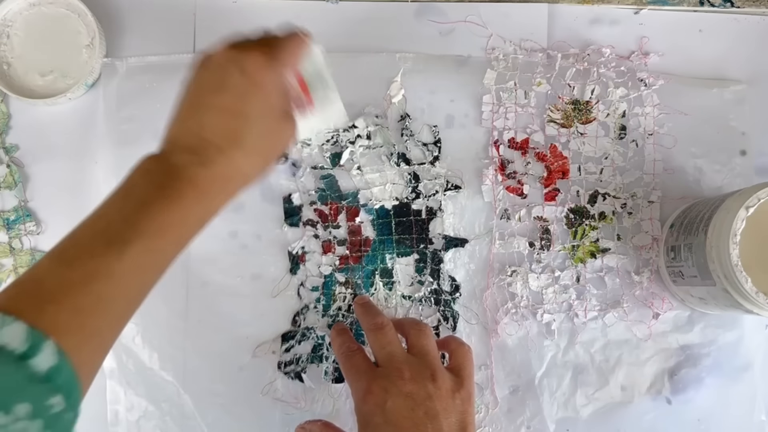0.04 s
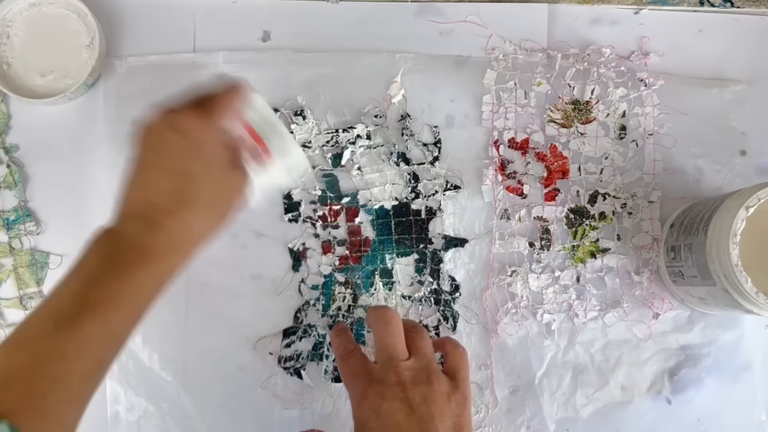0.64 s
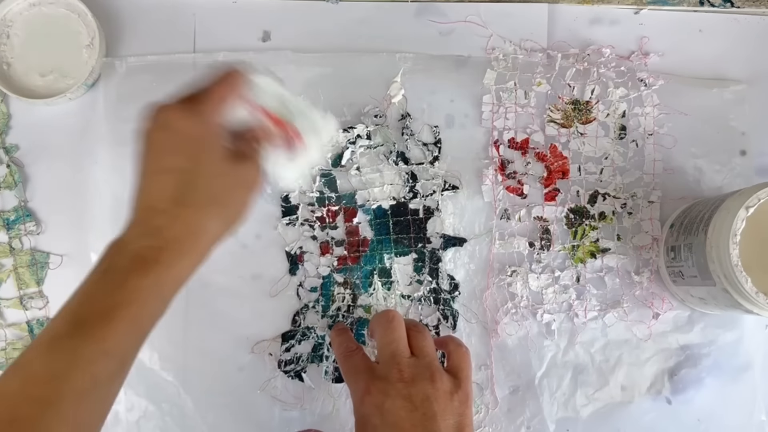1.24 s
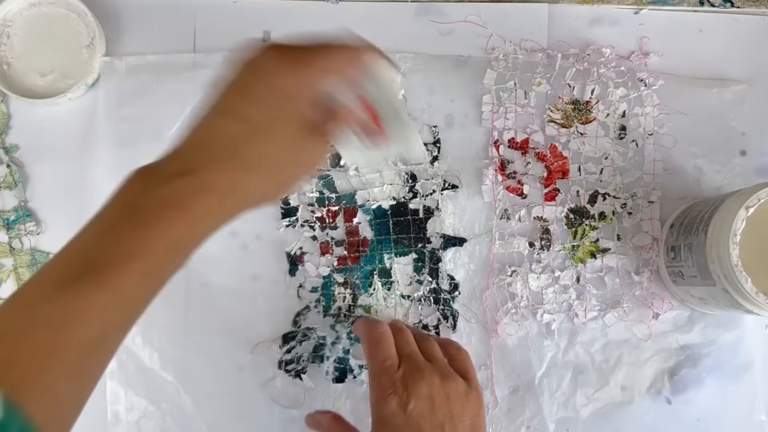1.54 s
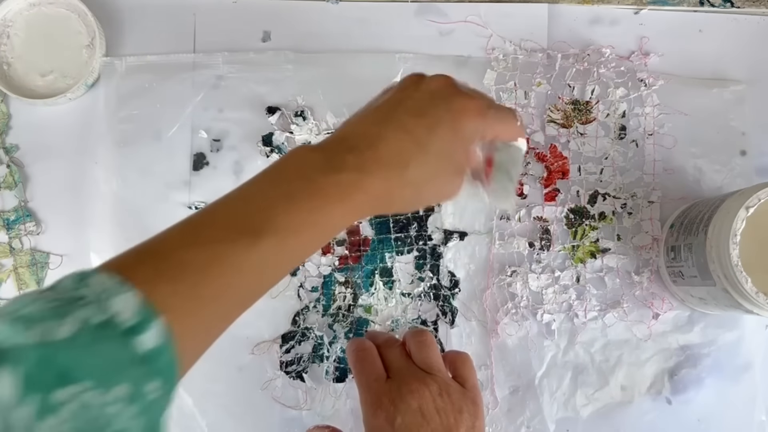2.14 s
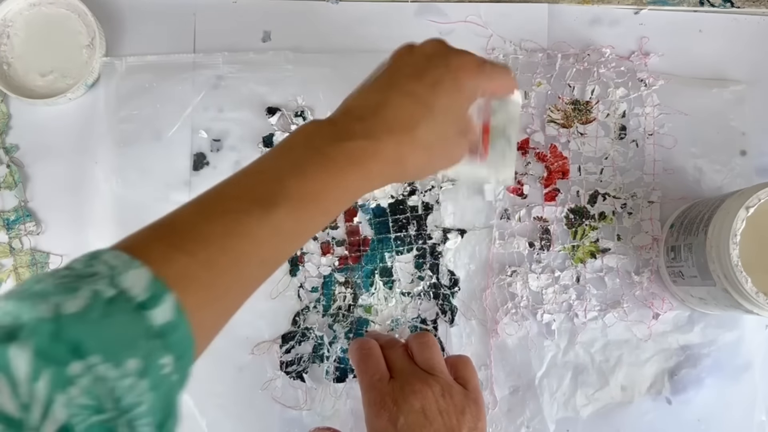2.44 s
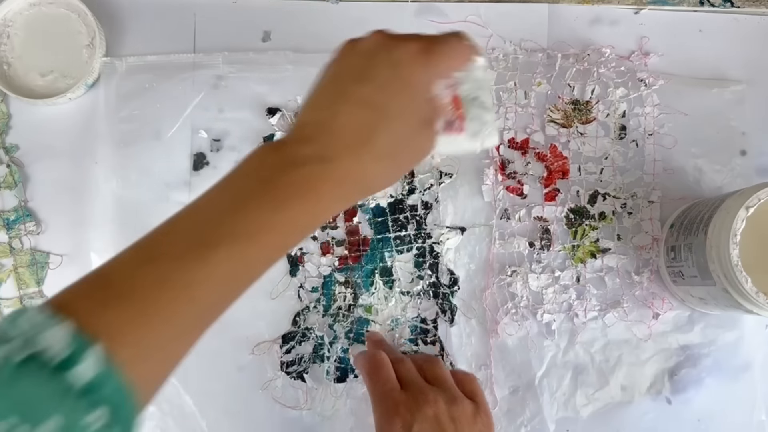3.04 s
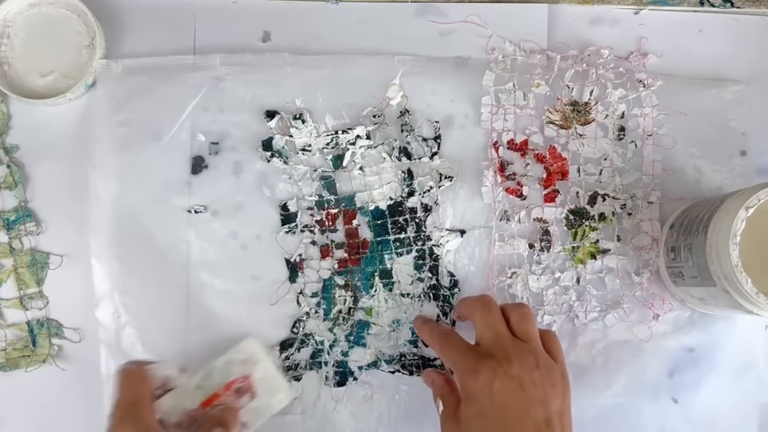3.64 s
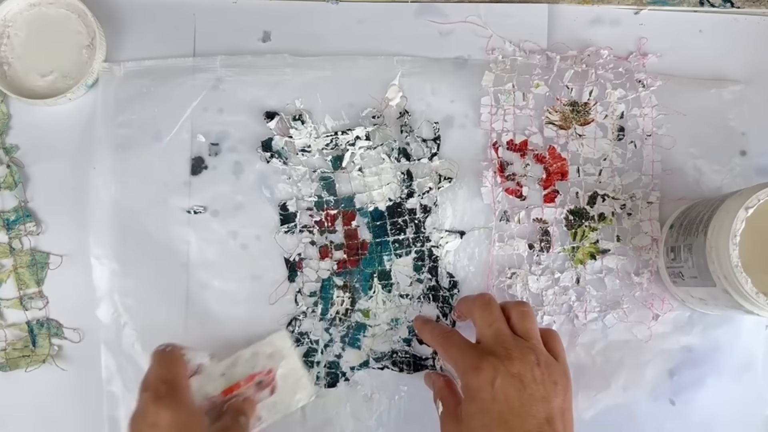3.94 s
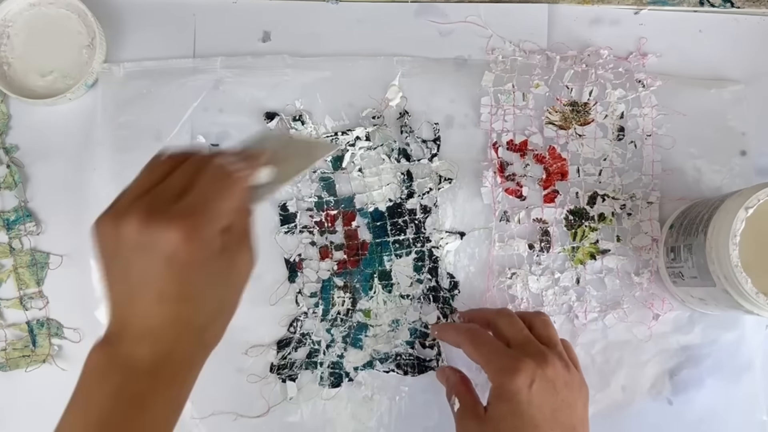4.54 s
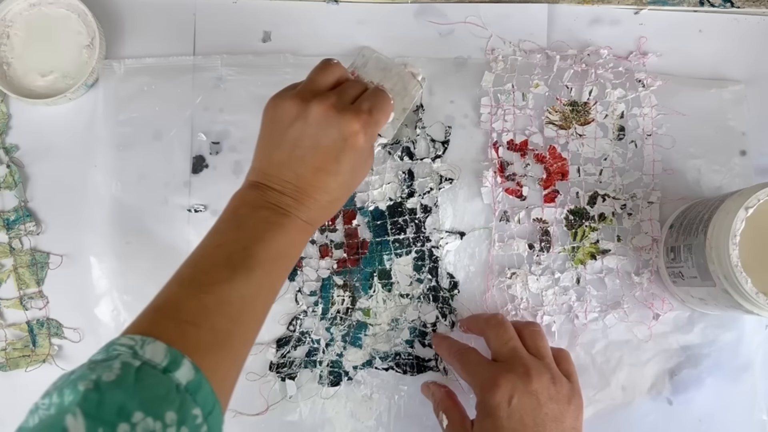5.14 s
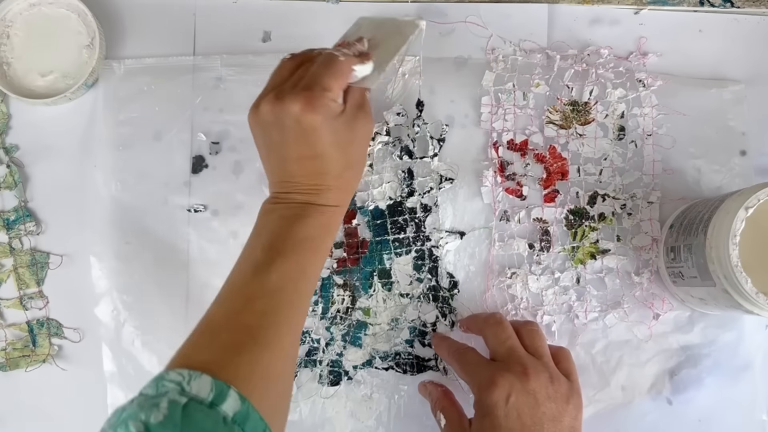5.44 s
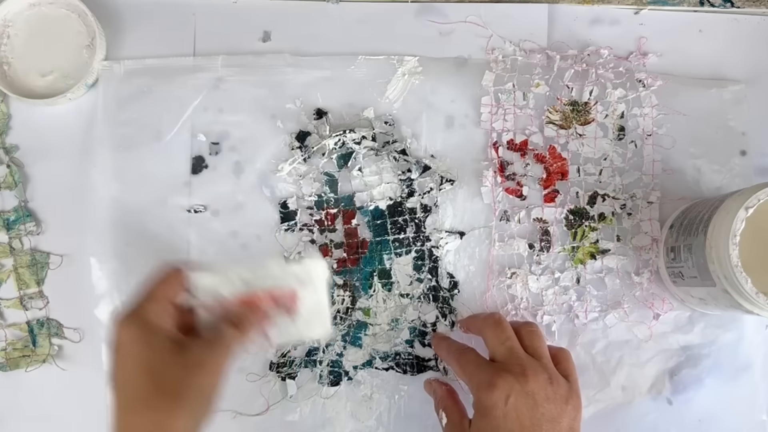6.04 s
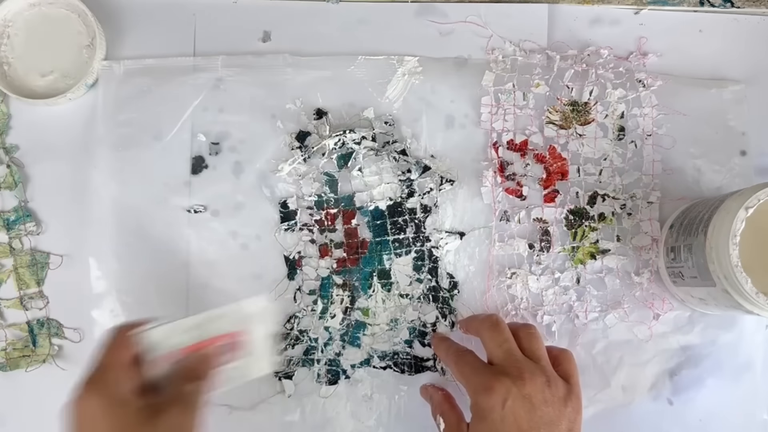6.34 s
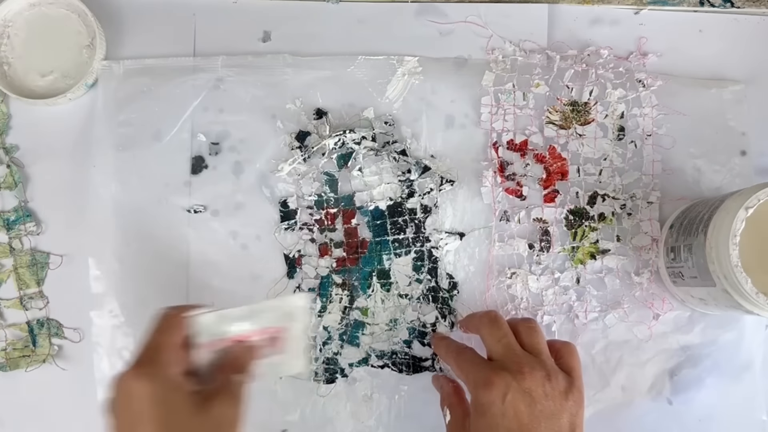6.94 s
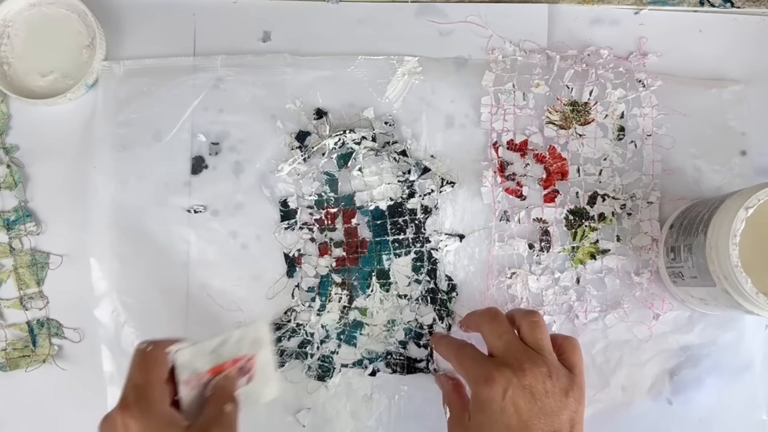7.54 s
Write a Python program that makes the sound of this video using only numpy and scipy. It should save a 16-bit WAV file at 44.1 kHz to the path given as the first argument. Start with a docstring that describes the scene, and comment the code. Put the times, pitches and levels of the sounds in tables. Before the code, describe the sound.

A wet, paint-loaded sponge dabs paper netting on a plastic-covered table, close by in a small room. From the start to about 3 seconds come roughly eleven quick dabs, each a short foamy fizz with a papery crinkle and a soft, low table thud, dotted with tiny snaps of creases and tacky paint. From about 3.5 to 4.4 seconds, three dabs land on the loose plastic, with more crackle and less thud. Light brushing and rustling follow around 4.5 seconds, then two quieter, slower presses near 5 and 5.3 seconds and a soft rustle up to 6 seconds. A faint, low motor hum rises at about 5 seconds and stays underneath. From about 6.1 seconds the dabbing resumes, around three a second, crisp and crackly, until the end near 7.8 seconds.

```python
"""Soft, wet dabs: a paint-loaded sponge presses paper netting on a plastic-covered table, close by.
Each dab squeezes a fizz from the foam, crinkles the sheet and thuds softly in the table.
Creases buckle and tacky paint snaps as it lets go. Dabs at the near edge land on the loose
sheet and crackle more. The room is small, and a faint motor hums in the second half."""
import sys
import numpy as np
from scipy import signal
from scipy.fft import rfft, irfft, next_fast_len
from scipy.io import wavfile
from scipy.ndimage import uniform_filter1d

SR = 44100
rng = np.random.default_rng(int(sys.argv[2]) if len(sys.argv) > 2 else 0)


def store_pcm(level_fs):
    """Save levels as 16-bit WAV."""
    pcm = np.round(np.clip(level_fs, -1, 1) * 32767).astype(np.int16)
    wavfile.write(sys.argv[1], SR, np.atleast_2d(pcm).T)


N = 343539
LEVEL_STEP = 20   # samples between the points of a loudness curve


def from_db(db):
    """Turn decibels into a gain."""
    return 10 ** (np.asarray(db) / 20)


def add_db(*levels):
    """Level of unrelated sounds heard together."""
    return 10 * np.log10(sum(10 ** (db / 10) for db in levels))


def rms_one(x):
    """Scale a sound to an average strength (rms) of 1."""
    return x / np.sqrt(np.mean(x ** 2) + 1e-20)


def peak_one(x):
    """Scale a sound so that its loudest few milliseconds have rms 1."""
    return x / np.sqrt(uniform_filter1d(x ** 2, size=110).max())


def curves(rows):
    """Join timed rows with straight lines: one curve for each column after the time."""
    time_s, *columns = np.transpose(rows)
    return [np.interp(np.arange(N) / SR, time_s, column) for column in columns]


def butter(x, hz, kind, order=2):
    """Keep the "low" or the "high" side of a frequency."""
    return signal.sosfilt(signal.butter(order, np.clip(hz, 10, .45 * SR), kind, fs=SR, output="sos"), x)


def resonate(x, hz, width_hz):
    """Ring at one pitch; the narrower the width, the longer the ring."""
    r = np.exp(-np.pi * width_hz / SR)
    feedback = [1, -2 * r * np.cos(2 * np.pi * hz / SR), r * r]
    return signal.lfilter(np.array([1, 0, -1]) * (1 - r * r) / 2, feedback, x)


def coloured(x, spectrum):
    """Give a steady sound its tone colour, at rms 1."""
    hz, level_db = np.transpose(spectrum)
    size = next_fast_len(N)
    log_hz = np.log(np.arange(size // 2 + 1) * SR / size + 1)
    gain = from_db(np.interp(log_hz, np.log(hz), level_db, left=-90, right=-90))
    return rms_one(irfft(rfft(x, size) * gain, size)[:N])


def blend(a, b, share):
    """Mix two unrelated sounds at equal power; share is the part of b."""
    share = np.clip(share, 0, 1)
    return np.sqrt(1 - share) * a + np.sqrt(share) * b


def grains(per_s, spread_db):
    """Tiny random clicks; a spread above 0 makes a few much larger than the rest."""
    sizes = from_db(spread_db * np.minimum(rng.exponential(1, N), 4))
    return rms_one((rng.random(N) < per_s / SR) * sizes * rng.choice([-1, 1], N))


def texture(level_db, per_s, spread_db, grainy):
    """Separate grains under the sponge, melting to a smooth hiss as the sound dies away."""
    contact = np.interp(level_db, [-60, -36], [.05, 1])
    return blend(rng.standard_normal(N), grains(per_s, spread_db), grainy * contact)


def clumps(flutter_hz, depth_db):
    """Grains come in little avalanches: a fast, uneven gain."""
    surge = rms_one(butter(rng.standard_normal(N), flutter_hz, "low"))
    return rms_one(from_db(depth_db * np.clip(surge, -2, 2)))


def room(x, fade_s=0.3):
    """The walls of a small room return a short wash of echoes that falls 60 dB in fade_s."""
    t = np.arange(SR // 2) / SR
    tail = rng.standard_normal(len(t)) * from_db(-60 * t / fade_s) * (t > .005)
    tail = butter(tail, 16000, "low", order=1)
    return signal.fftconvolve(x, tail / np.sqrt(np.sum(tail ** 2)))[:N]


# The motor's two tones: pitch_hz, relative_db
MOTOR_TONES = [(95, 13), (142.5, -0.5)]
# How loud the motor is: time_s, level_db
MOTOR_LEVEL = [(0, -64), (3.2, -63), (4.7, -64), (5.4, -48.5), (5.7, -52.5), (6.1, -55), (6.5, -48),
               (7.79, -54)]


def motor_hum():
    """A distant motor hums, wavering a little in pitch."""
    wavering_s = np.arange(N) / SR + .0012 * rms_one(butter(rng.standard_normal(N), 3, "low"))
    tones = sum(from_db(db) * np.sin(2 * np.pi * hz * wavering_s) for hz, db in MOTOR_TONES)
    return from_db(curves(MOTOR_LEVEL)[0]) * rms_one(tones)


# The paper's quiet rustle, in relative levels: time_s, treble_db, middle_db, bass_db
PAPER_RUSTLE = [(0.0, -71.0, -61.5, -60), (0.57, -68.5, -63.5, -53.5), (1.0, -69, -60, -70),
                (1.55, -54.5, -50, -51), (1.64, -59, -55.5, -55), (2.2, -74.5, -66, -62),
                (3.12, -54.5, -48.0, -46), (3.4, -56, -53.5, -59.5), (4.1, -61.0, -57, -58),
                (4.44, -47, -41.5, -68), (4.6, -52.5, -52.5, -53.5), (4.68, -59.5, -58, -59),
                (4.85, -67.0, -57, -55.5), (5.48, -63, -56, -51), (5.62, -48, -44.5, -40.5),
                (5.96, -56.5, -48.5, -47.5), (6.08, -70, -64.5, -52.5), (7.79, -53, -46.5, -58)]


def rustle_levels():
    """The paper rustles between dabs: the resting levels of fizz, crinkle and thud, in dB."""
    treble, middle, bass = [level[::LEVEL_STEP] for level in curves(PAPER_RUSTLE)]
    return treble + 1, middle - 1.5, bass - 3


def settling_creases(crinkle_db, per_s, gain_db):
    """The crumpled paper settles in sparse little ticks, each at one of twelve pitches."""
    pitches_hz = np.geomspace(1200, 6000, num=12)
    ticks = grains(per_s, spread_db=0)
    chosen = rng.integers(0, len(pitches_hz), N)
    rings = sum(resonate(ticks * (chosen == k) + 1e-18, hz, width_hz=67) * (hz / 2000) ** -.4
                for k, hz in enumerate(pitches_hz))
    # the ticks level off under a loud crinkle, so they stand out only between dabs
    settling_db = np.interp(crinkle_db, [-70, -38, -24], [-72, -38, -37])
    return from_db(settling_db + gain_db) * rms_one(rings)


# The sponge lands flat and traps air under the sheet: start_s, relative_db, pitch_fall_s
AIR_PATS = [(2.002, -27, 0.0077), (2.268, -28.5, 0.0076), (2.555, -26, 0.0061), (3.432, -48, .022),
            (3.835, -36.5, .008), (4.159, -40, .009), (7.378, -36, .009)]


def air_pats(start_hz=750, end_hz=135):
    """A cushion of air is pushed out: a soft pat whose pitch drops as the sheet settles."""
    out, t = np.zeros(N + SR), np.arange(SR // 6) / SR
    phases = rng.uniform(0, 2 * np.pi, len(AIR_PATS))
    for (start_s, db, fall_s), phase in zip(AIR_PATS, phases):
        pitch_hz = end_hz + (start_hz - end_hz) * np.exp(-t / fall_s)
        tone = np.sin(2 * np.pi * np.cumsum(pitch_hz) / SR + phase)
        age = t / (fall_s + 0.012)
        swell = (age * np.exp(1 - age)) ** 2
        start = round(start_s * SR)
        out[start:start + len(t)] += from_db(db + 1) * swell * tone
    return out[:N]


# The table top's low notes, and their relative levels when it is pressed in the middle or at the edge:
# pitch_hz, width_hz, middle_db, edge_db
TABLE_NOTES = [(54.4, 7.3, -15, -21), (106.8, 24, -33, 5.5), (140.4, 33, -0.5, 2), (180.7, 65, 1, -8.5),
               (254.6, 18, 0.5, -9.5), (307.5, 21.6, -1.5, -5.5), (366.4, 45, -7.5, 0),
               (443, 205, -14, -5.5)]


def table_thud(level_db, near_edge, slowness):
    """The soft, uneven push of the sponge shakes the low notes of the table top."""
    push, middle, edge = rng.standard_normal(N), 0, 0
    for k, (hz, width_hz, middle_db, edge_db) in enumerate(TABLE_NOTES):
        note = (-1) ** k * resonate(push, hz, width_hz)
        middle = middle + from_db(middle_db) * note
        edge = edge + from_db(edge_db) * note
    shake = blend(rms_one(middle), rms_one(edge), near_edge)
    shake = butter(butter(shake, 760, "low"), 40, "high", order=4)
    # a slow press favours the low notes
    shake = blend(shake, rms_one(resonate(push, 159, width_hz=63)), slowness)
    # the hand sets the strength of each thud, so chance swells are evened out
    shake = shake / np.sqrt(uniform_filter1d(shake ** 2, size=1500) + 1e-9)
    # under a hard press the foam is flat and part of the push goes into the knock
    spent_db = np.interp(level_db, [-34, -20], [0, -2.5])
    return from_db(level_db + spent_db - 0.97) * butter(shake, 28, "high")


# The sponge squashes flat against the table: start_s, relative_db, pitch_hz
TABLE_KNOCKS = [(0.06, -22.5, 181), (0.281, -24, 171), (0.648, -23, 189), (1.128, -19, 193),
                (1.334, -22, 183), (2.094, -16, 150), (2.397, -23, 169), (2.566, -25.5, 158),
                (2.677, -20.5, 170), (2.891, -24, 166), (2.928, -17.5, 153), (3.849, -28.5, 145),
                (4.227, -27.5, 170), (5.03, -29, 155), (5.08, -27, 143), (5.115, -27.5, 136),
                (6.282, -26.5, 122), (6.576, -28, 115), (6.87, -27, 142.1), (7.766, -29, 175)]


def table_knocks(rise_s=0.0076):
    """A soft push makes one table note swell and die quickly, with a weaker, higher note beside it."""
    out, t = np.zeros(N + SR), np.arange(SR // 8) / SR
    swell = (t / rise_s * np.exp(1 - t / rise_s)) ** 2.7
    tail = 0.055 * (1 - np.exp(-t / rise_s)) * from_db(-60 * t / 0.13)
    phases = rng.uniform(0, 2 * np.pi, (len(TABLE_KNOCKS), 2))
    for (start_s, db, hz), phase in zip(TABLE_KNOCKS, phases):
        low = np.sin(2 * np.pi * hz * t + phase[0])
        high = from_db(-7) * np.sin(2 * np.pi * 1.814 * hz * t + phase[1])
        start = round(start_s * SR)
        out[start:start + len(t)] += from_db(db + 1.5) * (swell + tail) * (low + high)
    return out[:N]


# The notes of the plastic sheet lying on the table: pitch_hz, width_hz, gain_db
SHEET_NOTES = [(722, 66, -10.5), (903, 11, -2), (1075, 46, -13.5), (1380, 29, -3), (1480, 26, -9),
               (1640, 34, -3), (1759, 34, -3), (1920, 43, -5), (2580, 29, -7), (2760, 43, -20.5),
               (3400, 33, -12)]


def on_sheet(x):
    """Whatever moves the sheet also sets its notes ringing."""
    return x + sum(from_db(db) * resonate(x, hz, width_hz) for hz, width_hz, db in SHEET_NOTES)


def burst(t, fast_s, tail_s, tail_db):
    """A sharp release, then a short shiver of the sheet; each falls 60 dB in its given time."""
    fade = from_db(-60 * t / fast_s) + from_db(tail_db - 60 * t / tail_s)
    return rng.standard_normal(len(t)) * fade


def fold(x, lag_s, share):
    """The far end of a crease follows a moment later, which makes a snap sound hollow."""
    samples = np.arange(len(x))
    return x + share * np.interp(samples - lag_s * SR, samples, x, left=0)


# The loudest creases buckling and paint letting go, in relative levels:
# start_s, ring_db, crack_db, pitch_hz
CREASE_AND_PAINT_SNAPS = [(0.0873, -29, -24.5, 3830), (0.3033, -26, -25, 3500), (0.3149, -31, -17, 7500),
                          (0.4353, -40, -44, 3570), (0.6482, -17, -30, 2300), (0.68, -34, -27, 3530),
                          (0.734, -24, -32, 2070), (0.7757, -37.5, -62, 2090), (0.9055, -22, -37, 2020),
                          (1.1442, -20, -39, 2060), (1.214, -25, -34, 2080), (1.3304, -14.5, -23, 2180),
                          (1.3747, -24, -20, 2780), (1.403, -25, -16, 6000), (1.4603, -34, -33, 2760),
                          (1.5726, -37.5, -33.5, 2500), (1.6665, -40, -48, 2980),
                          (1.6709, -21.5, -23, 5370), (1.8561, -22, -31, 5470), (2.0864, -16.5, -24, 2030),
                          (2.175, -23, -26, 2700), (2.469, -30, -36, 1200), (2.492, -25.5, -35, 4500),
                          (2.6713, -17, -16, 3340), (2.7328, -30, -45, 1740), (2.7448, -32, -39, 1820),
                          (2.8244, -32, -27, 2700), (2.8986, -15, -37, 1760), (2.933, -15, -13.5, 3900),
                          (2.9803, -26, -31.5, 1640), (3.068, -31, -33, 4320), (3.2581, -26.5, -24.5, 4280),
                          (3.373, -40.5, -50, 2520), (3.556, -18.5, -43, 1990), (3.561, -12.5, -24, 3000),
                          (3.592, -13, -20, 2450), (3.603, -14.5, -22, 2200), (3.639, -13, -19, 2080),
                          (3.653, -12, -14.5, 2440), (3.714, -39, -38, 2190), (3.901, -15.5, -21.5, 2050),
                          (3.939, -20, -39, 1890), (3.949, -14.5, -39, 2560), (3.97, -19, -39, 2260),
                          (3.996, -22, -47, 1920), (4.033, -24.5, -25.5, 3220), (4.2013, -13, -20.5, 1710),
                          (4.227, -16.5, -31, 2030), (4.2342, -19, -25, 2900), (4.243, -18, -24, 2900),
                          (4.276, -12, -20.5, 2180), (4.297, -19.5, -37, 2000), (4.3066, -15, -24, 1780),
                          (4.3421, -15, -24, 1550), (4.3586, -19.5, -48, 2050), (4.414, -29, -35, 5370),
                          (4.4811, -30, -38, 2360), (4.8494, -39.5, -77, 1320),
                          (5.0409, -19.5, -22.5, 4760), (5.307, -31, -21, 6000), (5.323, -26, -50, 1550),
                          (5.538, -37.5, -35.5, 4740), (5.604, -28, -54, 1870), (5.694, -39, -37, 1720),
                          (5.8346, -29, -31, 1640), (5.841, -39, -28, 6760), (6.1658, -17.5, -38, 1820),
                          (6.21, -22, -36, 2420), (6.3065, -11.5, -19, 1880), (6.3145, -17, -32, 2300),
                          (6.3487, -7, -12, 1870), (6.36, -15.5, -27, 1700), (6.3784, -26, -20, 3280),
                          (6.476, -15, -45, 2000), (6.4853, -16, -42, 2160), (6.514, -20, -23, 2900),
                          (6.6043, -10.5, -22.5, 2042), (6.8102, -21, -35, 1870), (6.8206, -19, -19, 2050),
                          (6.8657, -14, -22.5, 1420), (6.8915, -14, -32, 2230), (6.9014, -8.5, -18.5, 3171),
                          (7.15, -19, -29, 1850), (7.1691, -10, -19.5, 2550), (7.2352, -18.5, -42, 2130),
                          (7.255, -28, -27.5, 2510), (7.432, -21, -38, 1770), (7.4664, -13, -16.5, 2890),
                          (7.513, -16.5, -27, 2800), (7.5327, -11, -41, 2540), (7.5407, -17, -43, 2040),
                          (7.559, -39, -31, 3050)]


def snaps(landings, fizz_db, open_top_hz=4850, pressed_top_hz=8800):
    """Creases, paint and landings snap: a bright crack and the brief ring of a patch of sheet."""
    out, t = np.zeros(N + SR), np.arange(SR // 10) / SR
    for start_s, ring_db, crack_db, hz in CREASE_AND_PAINT_SNAPS + landings:
        start = round(start_s * SR)
        lag_s = rng.integers(1, 4) / hz
        flex = on_sheet(burst(t, fast_s=0.012, tail_s=0.06, tail_db=-3))
        flex = butter(butter(flex, 1040, "high", order=3), 4370, "low", order=3)
        ring = resonate(flex, hz, width_hz=800) + 0.47 * flex
        ring = peak_one(fold(ring, lag_s, share=0.41))
        tear = fold(burst(t, fast_s=0.012, tail_s=0.09, tail_db=-18), lag_s, share=0.5)
        # a crack is brighter under the sponge than in the open
        top_hz = np.interp(fizz_db[start], [-48, -32], [open_top_hz, pressed_top_hz])
        crack = peak_one(butter(butter(tear, 4700, "high", order=3), top_hz, "low"))
        out[start:start + len(t)] += from_db(ring_db + 3) * ring + from_db(crack_db + 3) * crack
    return out[:N]


# The tone colour of the paper netting: pitch_hz, relative_db
NETTING_COLOUR = [(300, -19), (480, -5), (750, 0), (1080, -2.5), (1500, -0.5), (1850, 2), (2300, 1.5),
                  (3500, -.5), (4300, -6), (6000, -26)]
# The tone colour of the loose plastic sheet: pitch_hz, relative_db
SHEET_COLOUR = [(300, -16.5), (480, -12), (880, -3), (1050, -3.5), (1450, -3), (1650, -1.5), (1950, -1.5),
                (2250, -1.5), (3000, -2.5), (4200, -8.5), (6000, -20.5)]


def crinkle(level_db, near_edge):
    """The netting rustles finely; the loose sheet at the edge crackles in coarser clumps."""
    netting = texture(level_db, per_s=5600, spread_db=3.5, grainy=0.57)
    netting *= clumps(flutter_hz=150, depth_db=2.5)
    netting = from_db(-0.47) * coloured(on_sheet(netting), NETTING_COLOUR)
    sheet = texture(level_db, per_s=2000, spread_db=2, grainy=0.35)
    sheet *= clumps(flutter_hz=129, depth_db=4.5)
    sheet = from_db(-0.7) * coloured(on_sheet(sheet), SHEET_COLOUR)
    return from_db(level_db) * blend(netting, sheet, near_edge)


# The tone colour of the wet foam: pitch_hz, relative_db
FOAM_COLOUR = [(2800, -9), (4200, 0.5), (5200, 1.5), (7000, -1.5), (9500, -5.5), (11500, -3.5),
               (13500, -7.5), (16000, -9.5)]


def foam_fizz(level_db, slowness):
    """Thousands of wet foam cells burst in small clusters as the sponge is squeezed."""
    cells = texture(level_db, per_s=8900, spread_db=0, grainy=0.64)
    cells = coloured(cells * clumps(flutter_hz=110, depth_db=1.9), FOAM_COLOUR)
    # the dying sound loses its treble first; a slow press opens the finest cells and sounds brighter
    treble = signal.sosfiltfilt(signal.butter(2, 8000, "high", fs=SR, output="sos"), cells)
    treble_db = np.interp(level_db, [-60, -45, -30], [-2.5, -1.5, 1.2]) + 9.4 * slowness
    return from_db(level_db - 0.32) * (cells + (from_db(treble_db) - 1) * treble)


# Light brushes of the sponge: peak_s, fizz_db
SPONGE_BRUSHES = [(0.44, -45), (4.42, -40), (4.521, -36), (4.586, -38), (4.736, -47), (5.95, -34.5)]


def brush_levels(t, rise_db_per_s=993, fall_db_per_s=502):
    """Each brush is a fizz that is over at once: one loudness curve per brush, in dB."""
    return [db - np.maximum(rise_db_per_s * (peak_s - t), fall_db_per_s * (t - peak_s))
            for peak_s, db in SPONGE_BRUSHES]


# Each dab of the sponge, in relative levels; swell_db is scaled for each layer of the sound:
# lands_s, pressed_s, lifts_s, tick_db, swell_db, held_change_db, fizz_db, crinkle_db, thud_db
SPONGE_DABS = [(0.013, 0.061, 0.1, -41.5, 12, -9, -28, -27.5, -27.0),
               (0.245, 0.296, 0.32, -34.5, 9.5, -7, -23.5, -23.5, -27),
               (0.614, 0.643, 0.67, -32.5, 10, -5.5, -21.0, -17.5, -23.5),
               (0.865, 0.908, 0.94, -28.5, 11.0, -11.5, -23, -21, -22),
               (1.082, 1.136, 1.154, -33, 13, -6.5, -23.5, -20, -24),
               (1.304, 1.324, 1.374, -32.5, 16, -1.5, -26.5, -25.5, -30.5),
               (1.73, 1.792, 1.789, -34, 12, -3.5, -19.5, -17.5, -22),
               (2, 2.056, 2.093, -32.5, 21, 1.5, -24, -21.5, -24.5),
               (2.266, 2.328, 2.393, -29.5, 24, 8, -28.0, -25.5, -30.5),
               (2.553, 2.65, 2.661, -22.5, 10, 1, -23, -20.5, -24),
               (2.817, 2.903, 2.921, -33.5, 18.0, 1, -21.5, -17.5, -19),
               (3.433, 3.455, 3.46, -49.5, -4, 4, -59, -43.5, -37),
               (3.521, 3.543, 3.686, -44.0, 13, 1.5, -32, -24, -39),
               (3.833, 3.891, 4.008, -27.5, 11.5, -2, -30, -24.5, -38.0),
               (4.156, 4.208, 4.376, -28.5, 29.5, -5.5, -28, -20.5, -33.5),
               (4.895, 4.923, 5.16, -59, 10, 2.5, -42.5, -41, -39),
               (5.261, 5.32, 5.324, -44, 15, -2, -36, -35.5, -34.5),
               (6.136, 6.153, 6.28, -45, 7, 3, -32.5, -24.0, -37.0),
               (6.283, 6.308, 6.335, -39, 5, -2.5, -46, -26.5, -38),
               (6.451, 6.527, 6.61, -32, 2.5, -0.5, -30, -22.0, -34),
               (6.753, 6.822, 6.94, -44, 12.5, -4.5, -27, -20.5, -31.5),
               (7.058, 7.133, 7.223, -36, 9, -3, -28, -22.5, -33.5),
               (7.378, 7.48, 7.56, -29.5, 12, -9, -26.5, -20, -30),
               (7.679, 7.739, 7.86, -38.5, 5, 1.5, -29.0, -23.5, -28)]


def dab_levels(t, layer, tick_gain_db, swell_scale, drop_db, drop_s, tail_db_per_s):
    """One layer's loudness in dB: each dab ticks, swells as the foam is squeezed, holds and lifts."""
    touch_s, tick_db_per_s = 0.0036, 600   # the foam needs a moment to meet the paper
    column = ("fizz", "crinkle", "thud").index(layer)
    levels = []
    for lands_s, pressed_s, lifts_s, tick_db, swell_db, held_change_db, *layers_db in SPONGE_DABS:
        squeeze = np.clip((t - lands_s) / max(pressed_s - lands_s, .005), 0, 1)
        held = np.clip((t - pressed_s) / max(lifts_s - pressed_s, .005), 0, 1)
        lifted_s = np.maximum(t - lifts_s, 0)
        press = layers_db[column] - swell_scale * swell_db * (1 - squeeze) + held_change_db * held
        release = drop_db * (1 - np.exp(-lifted_s / drop_s)) + tail_db_per_s * lifted_s
        tick = tick_db + tick_gain_db - tick_db_per_s * np.maximum(t - lands_s - touch_s, 0)
        contact = np.clip((t - lands_s) / touch_s, 1e-6, 1)
        levels.append(add_db(np.maximum(press - release, -200), tick) + 20 * np.log10(contact))
    return add_db(*levels)


def landing_snaps(lag_s=0.003, pitch_hz=2300):
    """The first touch of each dab snaps the sheet: extra rows for snaps()."""
    return [(lands_s + lag_s, tick_db + 0.5, tick_db - 8.5, pitch_hz)
            for lands_s, _, _, tick_db, *_ in SPONGE_DABS]


def sponge_levels():
    """Loudness of fizz, crinkle and thud in dB: all dabs and brushes over the quiet rustle."""
    t = np.arange(0, N, LEVEL_STEP) / SR
    treble_db, middle_db, bass_db = rustle_levels()
    fizz_db = dab_levels(t, "fizz", tick_gain_db=-3, swell_scale=1.1,
                         drop_db=10, drop_s=0.0088, tail_db_per_s=179)
    crinkle_db = dab_levels(t, "crinkle", tick_gain_db=2, swell_scale=1.45,
                            drop_db=10.5, drop_s=0.016, tail_db_per_s=149)
    thud_db = dab_levels(t, "thud", tick_gain_db=-7, swell_scale=1.74,
                         drop_db=5, drop_s=0.02, tail_db_per_s=144)
    layers = [(treble_db, fizz_db, *brush_levels(t)), (middle_db, crinkle_db), (bass_db, thud_db)]
    return [np.interp(np.arange(N) / SR, t, add_db(*layer)) for layer in layers]


# Where and how the sponge lands:
# time_s, near_edge (0 on the netting, 1 on the loose sheet), slowness (0 quick dab, 1 slow press)
SPONGE_TOUCH = [(0, 0.12, 0.17), (3.1, 0.05, 0.01), (3.45, 0.9, 0.12), (4.5, 0.87, 0.053),
                (4.85, 0.42, 0.43), (5.35, 0.36, 0.93), (5.6, 0.97, 0.11), (7.79, 0.54, 0.022)]


def scene():
    """The sponge dabs away over the faint motor, the same in both ears."""
    fizz_db, crinkle_db, thud_db = sponge_levels()
    near_edge, slowness = curves(SPONGE_TOUCH)
    sponge = foam_fizz(fizz_db, slowness) + crinkle(crinkle_db, near_edge)
    sponge += table_thud(thud_db, near_edge, slowness) + air_pats()
    motor = motor_hum()
    hits = table_knocks() + settling_creases(crinkle_db, per_s=90, gain_db=-5)
    hits += snaps(landing_snaps(), fizz_db)
    mix = motor + sponge + hits + from_db(-30) * room(hits)
    return np.array([mix, mix])


def record(dry):
    """Round off the highest peaks and cut the very top of the treble."""
    ceiling, cutoff_hz = .93, 16000
    rounded = ceiling * dry / (ceiling ** 4 + dry ** 4) ** (1 / 4)
    low_pass = signal.firwin(255, cutoff_hz, fs=SR)
    return signal.fftconvolve(rounded, low_pass[None], mode="same", axes=1)


dry = scene()
out = record(dry)
store_pcm(out)
```